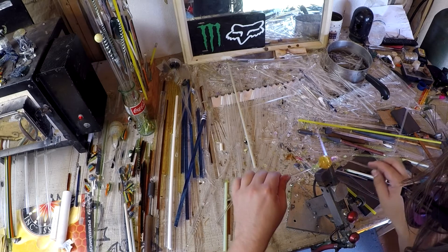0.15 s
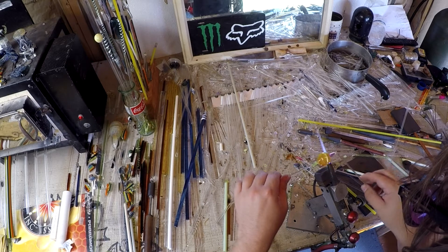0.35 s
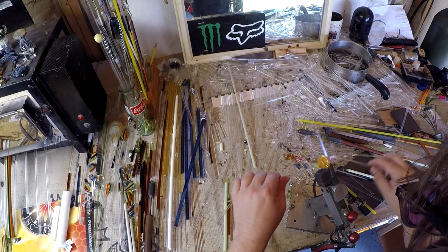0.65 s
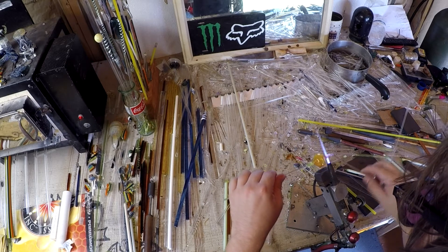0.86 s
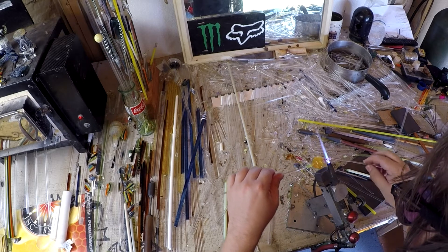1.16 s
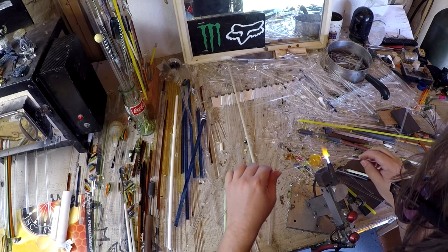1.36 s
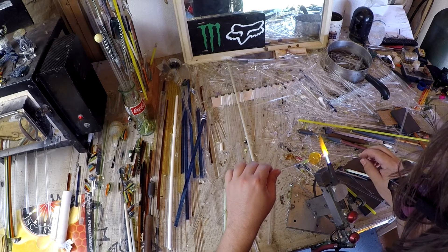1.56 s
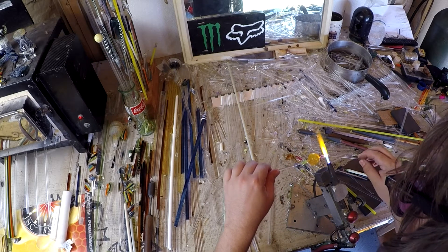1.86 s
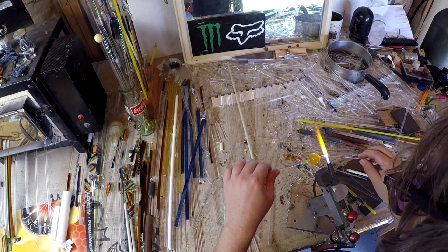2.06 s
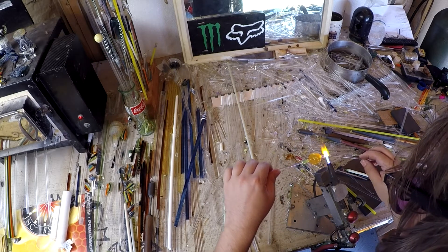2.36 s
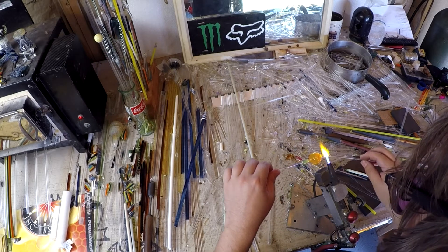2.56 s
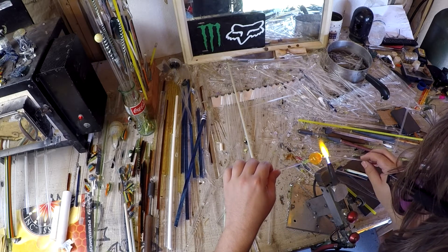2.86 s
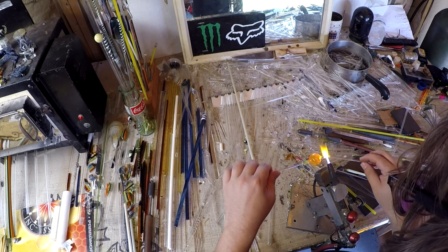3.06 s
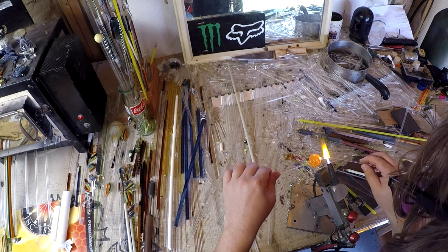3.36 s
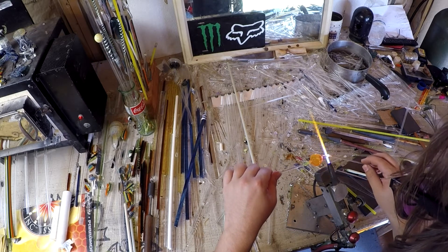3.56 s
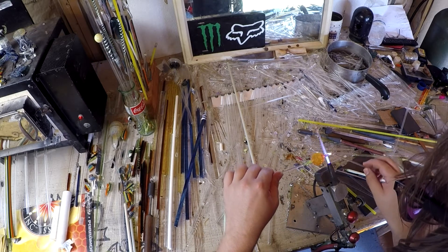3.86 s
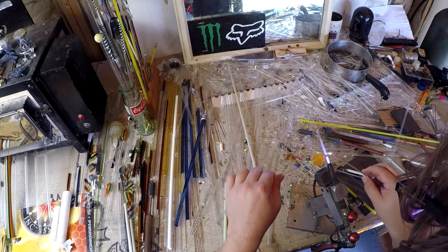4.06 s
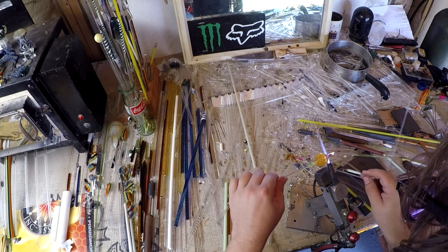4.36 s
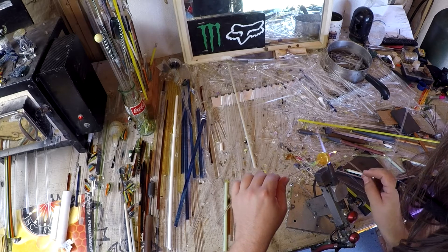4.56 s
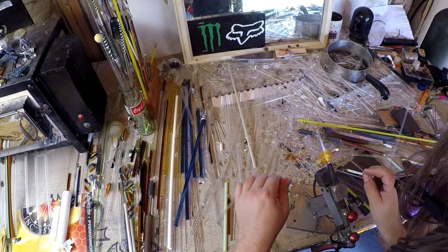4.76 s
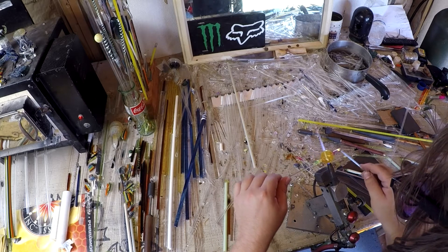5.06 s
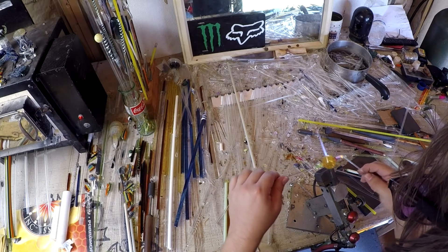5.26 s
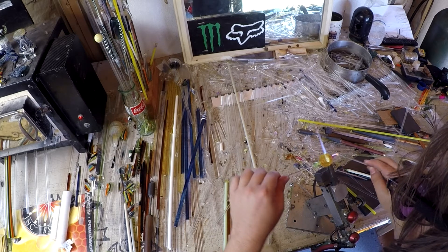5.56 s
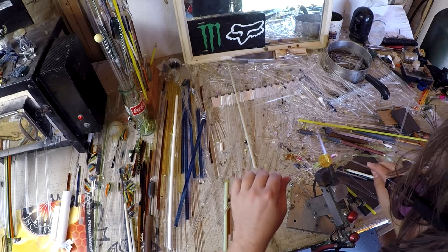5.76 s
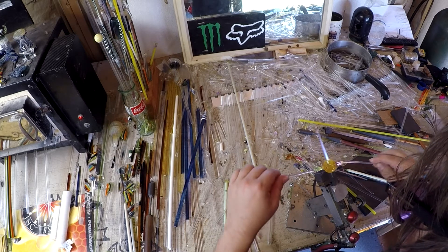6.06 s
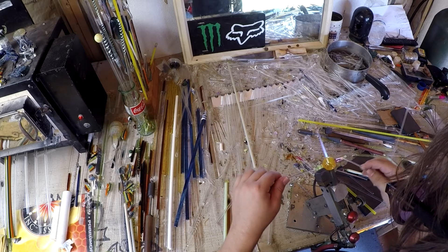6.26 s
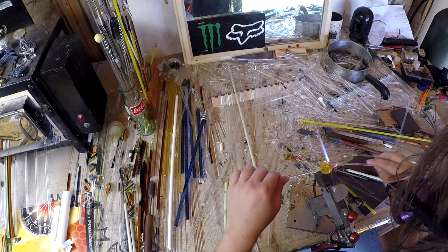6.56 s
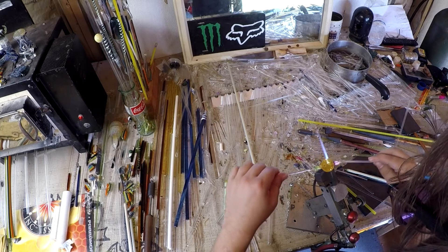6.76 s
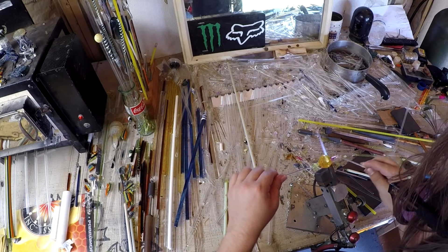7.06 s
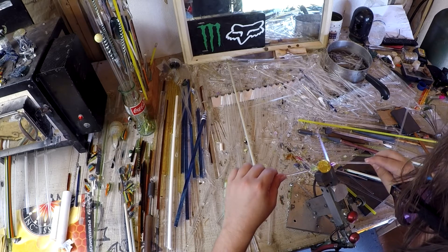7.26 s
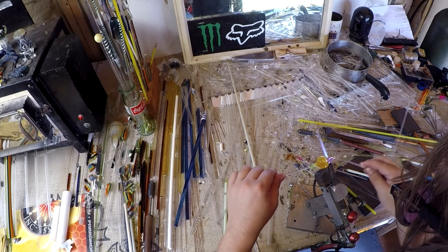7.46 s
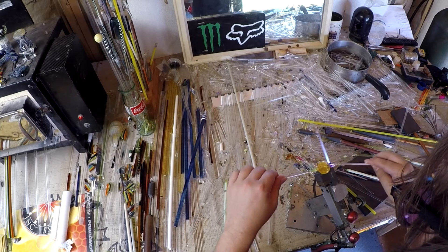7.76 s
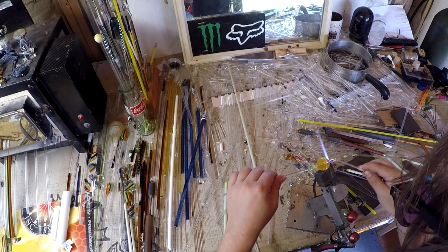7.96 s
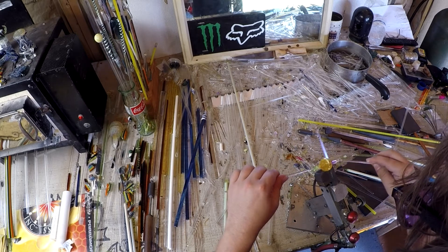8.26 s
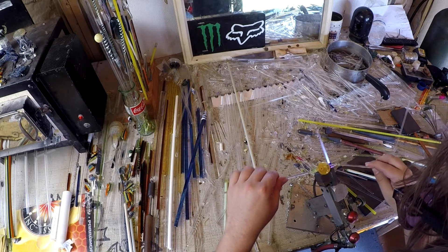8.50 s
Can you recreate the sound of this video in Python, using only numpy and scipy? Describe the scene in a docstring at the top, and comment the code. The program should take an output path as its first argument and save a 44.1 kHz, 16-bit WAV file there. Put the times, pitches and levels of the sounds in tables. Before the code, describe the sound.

A gas torch hisses over a rumbling, humming fan, with one sharp glass snap and a few light ticks of glass rods.

```python
"""A glassworker's bench torch hisses throughout, over an extractor fan's rumble and motor hum.
At 1.7 s a piece of glass snaps; the fan then speeds up slightly. From 2.3 s thin glass rods graze
and tick against each other. Around 4.3 s the oxygen is opened and the hiss grows a little.
At 8 s comes the loudest tick and the fan slows back. The bench and the near walls of the small
workshop throw each click back."""
import sys
import numpy as np
from scipy import signal
from scipy.fft import rfft, irfft
from scipy.io import wavfile

SR = 44100
rng = np.random.default_rng(int(sys.argv[2]) if len(sys.argv) > 2 else 0)


def transcribe(u):
    """Save the signal u as a 16-bit wav file named by the first command-line argument.

    u: samples, shape (n,) or (channels, n), limited to [-1, 1]; the rate is SR.
    q: integer samples, one column per channel.
    """
    v = np.clip(np.atleast_2d(u).T, -1, 1)
    q = np.round(v * 32767).astype(np.int16)
    wavfile.write(sys.argv[1], SR, q)


N = 380583


def amp(db):
    """Decibels to gain."""
    return 10 ** (np.asarray(db) / 20)


def read(points, hz):
    """Interpolate (frequency [Hz], value) rows over log frequency."""
    f, value = np.transpose(points)
    return np.interp(np.log(hz + 1), np.log(f + 1), value)


def ramp(start_s, end_s):
    """Linear rise from 0 to 1 between two times."""
    return np.clip((np.arange(N) / SR - start_s) / (end_s - start_s), 0, 1)


def drift(rate_hz):
    """Slow random wander, rms 1."""
    hz = np.fft.rfftfreq(N, 1 / SR)
    slow = irfft(rfft(rng.standard_normal(N)) * np.exp(-(hz / rate_hz) ** 2) * (hz > 0), N)
    return slow / slow.std()


def turbulence(spectrum, peaks):
    """Noise of a given spectral density, lifted at each resonance."""
    hz = np.fft.rfftfreq(N, 1 / SR)
    lift_db = sum(db * .5 ** ((2 * (hz - f) / width) ** 2) for f, width, db in peaks)
    density_db = read(spectrum, hz) + lift_db
    return irfft(rfft(rng.standard_normal(N)) * amp(density_db), N) * np.sqrt(SR / 2)


def clicks(impulses, colour, size=2048):
    """Impulses (time [s], gain), each spread into a minimum-phase pulse of the given spectrum."""
    log_gain = np.log(amp(read(colour, abs(np.fft.fftfreq(size, 1 / SR)))))
    pulse = np.fft.ifft(np.exp(np.conj(signal.hilbert(log_gain)))).real[:size // 2]
    train = np.zeros(N)
    for s, gain in impulses:
        train[round(s * SR)] += gain
    return signal.oaconvolve(train, pulse)[:N]


def torch(soft_db=-.5, keen_db=.57, oxygen_s=(3.5, 5.1), flutter_db=.35, flutter_hz=9):
    """Flame and entrained air hiss, flutter and swell as the oxygen opens; a thin fizz stays steady."""
    # flame and air noise: (frequency [Hz], density [dB/Hz])
    hiss = [(200, -84.5), (600, -80), (1000, -81), (1500, -83), (2200, -83.5), (2800, -88), (4000, -90),
            (5000, -96.5), (6000, -104.5), (7300, -117), (15000, -135)]
    # its resonances: (frequency [Hz], width [Hz], lift [dB])
    hiss_peaks = [(762, 99, 3.5), (870, 38, 5), (979, 85, 4), (1048, 21, 4.5), (1123, 35, 2.5),
                  (1327, 51, 4.5), (1745, 56, 5), (1823, 48, 3), (1956, 85, 4.5), (2240, 40, 6.5),
                  (2306.5, 80, 11), (2405, 34, 10), (2475, 32, 5.1), (2602, 135, 6.5), (2880, 66, 4),
                  (3289, 230, 2), (3955, 180, 3.5), (4480, 64, 2), (4850, 62, 0)]
    # thin high hiss: (frequency [Hz], density [dB/Hz])
    fizz = [(1000, -112), (7000, -109.5), (8000, -109.2), (10000, -112), (12000, -113.3), (14400, -114.4),
            (15300, -119)]
    # its faint whistles: (frequency [Hz], width [Hz], lift [dB])
    whistles = [(8714, 125, 4.8), (9781, 115, 6), (11960, 155, 2.7)]
    flow_db = soft_db + (keen_db - soft_db) * ramp(*oxygen_s)
    jet = turbulence(hiss, hiss_peaks) * amp(flow_db + flutter_db * drift(flutter_hz))
    return jet + turbulence(fizz, whistles)


def fan(slow_hz=18.26, fast_hz=18.465, speed_up_s=(1.9, 2.9), slow_down_s=(8.0, 8.35),
        waver_db=.7, waver_hz=4, load_db=.5):
    """Six-bladed fan: tones locked to the shaft, in an air rumble that grows with speed."""
    # fan tones: (multiple of shaft speed, rms level [dB])
    orders = [(2, -52), (3, -48), (6, -45.5), (7.5, -54.5), (12, -36), (18, -60.5), (19, -62.5),
              (24, -61.5)]
    # drawn air: (frequency [Hz], density [dB/Hz])
    air = [(8, -69), (14, -59), (45, -56.5), (72, -64.5), (140, -66), (200, -65), (265, -72), (370, -75),
           (540, -77), (900, -96.5), (3000, -135)]
    # duct and room resonances: (frequency [Hz], width [Hz], lift [dB])
    duct = [(103.5, 30, 10.5), (231, 28, 6), (288.6, 21.4, 7), (424.5, 39, 5)]
    shaft_hz = slow_hz + (fast_hz - slow_hz) * (ramp(*speed_up_s) - ramp(*slow_down_s))
    turns = np.cumsum(shaft_hz) / SR
    tones = np.zeros(N)
    for order, db in orders:
        peak = np.sqrt(2) * amp(db + waver_db * drift(waver_hz))
        tones += peak * np.sin(2 * np.pi * (order * turns + rng.random()))
    swell_db = load_db * (shaft_hz - shaft_hz.mean()) / np.ptp(shaft_hz)
    return tones + turbulence(air, duct) * amp(swell_db)


def motor():
    """Steady electrical hum of a mains motor."""
    # hum lines: (frequency [Hz], rms level [dB])
    hum = [(58.5, -52), (120, -41.5), (360, -59.5)]
    t = np.arange(N) / SR
    return np.sqrt(2) * sum(amp(db) * np.sin(2 * np.pi * (hz * t + rng.random())) for hz, db in hum)


def glass_snap():
    """Glass breaks: one hard pulse and its recoil."""
    # pulse and recoil: (time [s], level [dB], polarity)
    pulses = [(1.66533, -7, 1), (1.66581, -16, -1)]
    # snap spectrum: (frequency [Hz], gain [dB])
    colour = [(150, -22), (500, -12), (850, 1), (1400, 1.5), (2200, 9.5), (3400, 2.5), (5000, 4.5),
              (7500, -4), (9500, -2), (12000, -6), (15000, -16)]
    return clicks([(s, polarity * amp(db)) for s, db, polarity in pulses], colour)


def workshop(x, echo_db, tail_db, scatter_db, scatter_t60_s, tail_rise_s=.0051, scatter_rise_s=.002):
    """Direct sound, first echoes, brief scatter off the cluttered bench, and the room's tail."""
    # echoes off bench, tools and window: (delay [ms], level re echo_db [dB])
    echoes = [(3.5, -8), (4.0, -9.5), (6.4, -7), (11.1, -15)]
    # room decay: (frequency [Hz], T60 [s])
    decay = [(300, .25), (2000, 0.17), (5000, 0.19), (10000, 0.13), (15000, .12)]
    t = np.arange(SR // 2) / SR
    hz, frame_s, bands = signal.stft(rng.standard_normal(len(t)), SR, nperseg=128)
    bands *= 1000 ** (-frame_s / read(decay, hz)[:, None])
    tail = signal.istft(bands, SR, nperseg=128)[1][:len(t)]
    tail *= 1 - np.exp(-(t / tail_rise_s) ** 2)
    scatter = rng.standard_normal(len(t)) * 1000 ** (-t / scatter_t60_s)
    scatter *= 1 - np.exp(-t / scatter_rise_s)
    response = amp(tail_db) * tail / np.linalg.norm(tail)
    response += amp(scatter_db) * scatter / np.linalg.norm(scatter)
    response[0] += 1  # direct path
    for ms, db in echoes:
        response[round(ms * SR / 1000)] += amp(db + echo_db)
    return signal.oaconvolve(x, response)[:N]


def rod_ticks(usual_graze_db=-46.5, usual_landing_db=-43, graze_db_per_db=.35):
    """A rod grazes its neighbour, then lands on it; the graze grows only a little with the landing."""
    # landings: (time [s], level [dB], lead of the graze [s])
    ticks = [(2.2565, -40, .0055), (2.2805, -45, .0055), (3.6765, -42, .0055), (3.701, -46, .017),
             (3.717, -45, .006), (3.738, -46, .006), (7.115, -49, .017), (7.576, -48.5, .007),
             (8.0288, -31.5, .0125)]
    # tick spectrum: (frequency [Hz], gain [dB])
    colour = [(1000, -20), (4000, -1), (6000, 4), (7700, -2), (9200, 5.5), (11000, 3), (13000, 1),
              (15000, -2)]
    impulses = []
    for s, db, lead_s in ticks:
        graze_db = usual_graze_db + graze_db_per_db * (db - usual_landing_db)
        impulses += [(s - lead_s, amp(graze_db)), (s, amp(db))]
    return clicks(impulses, colour)


def scene():
    """Mono mix: the snap is close by; the rods lie among clutter and are heard less directly."""
    steady = torch() + fan() + motor()
    snap = workshop(glass_snap(), echo_db=-3, tail_db=-9, scatter_db=-7, scatter_t60_s=.04)
    rods = workshop(rod_ticks(), echo_db=1, tail_db=0, scatter_db=4, scatter_t60_s=.028)
    return (steady + snap + rods)[None]


def record(dry, cutoff_hz=15300):
    """Steep low-pass on the top treble."""
    lowpass = signal.firwin(511, cutoff_hz, window=("kaiser", 9), fs=SR)
    return signal.oaconvolve(dry, lowpass[None], "same")


dry = scene()
out = record(dry)
transcribe(out)
```